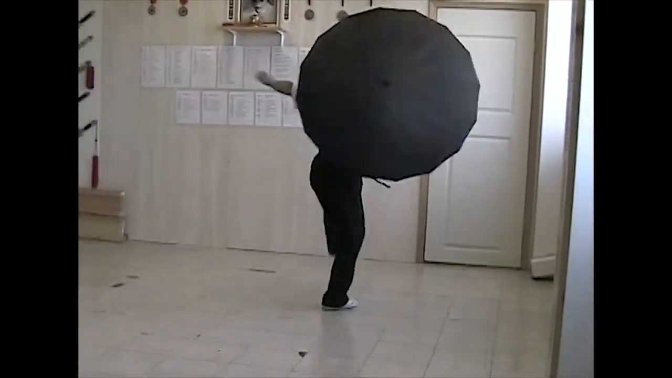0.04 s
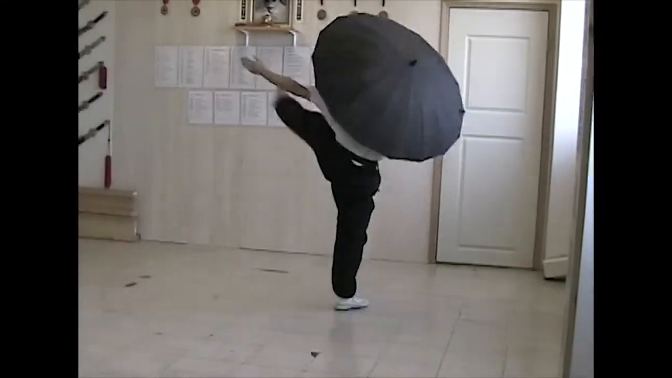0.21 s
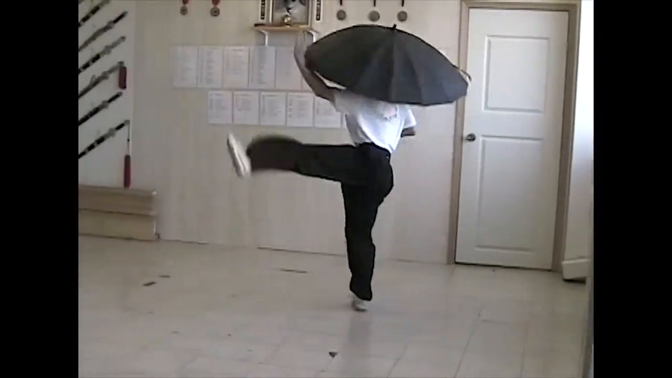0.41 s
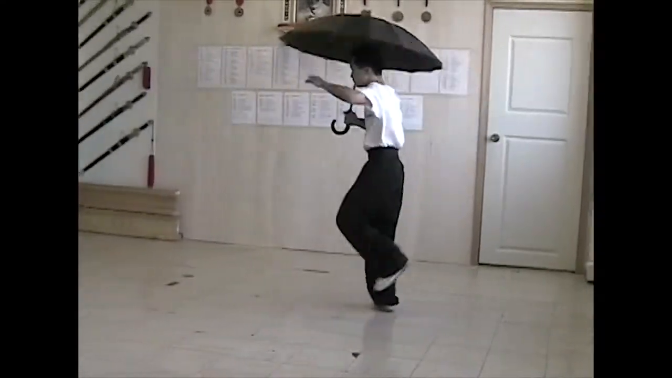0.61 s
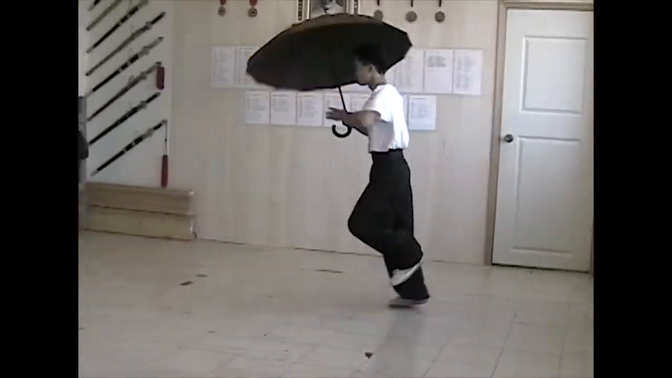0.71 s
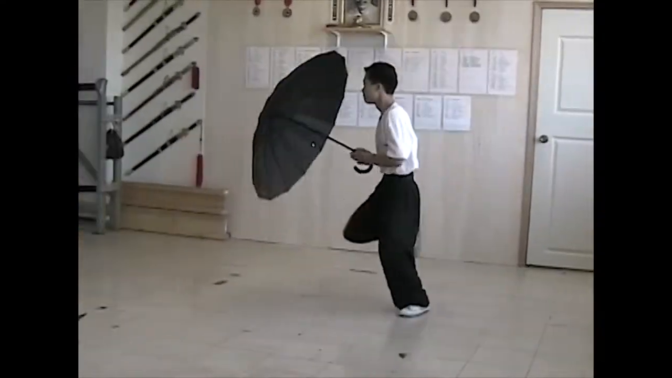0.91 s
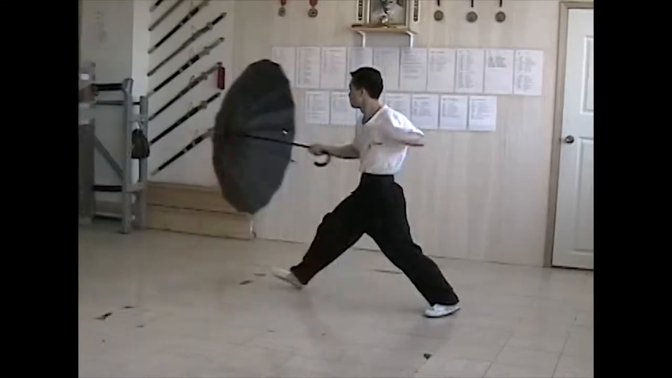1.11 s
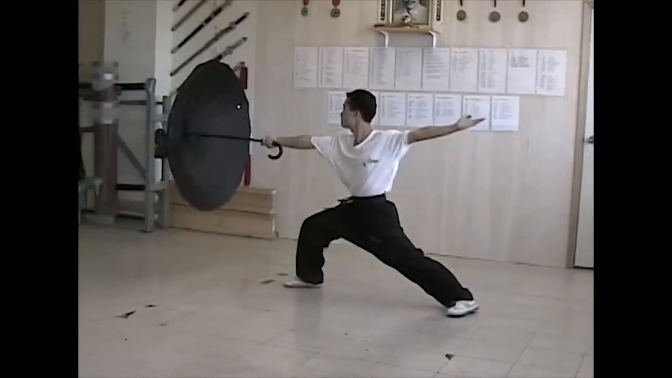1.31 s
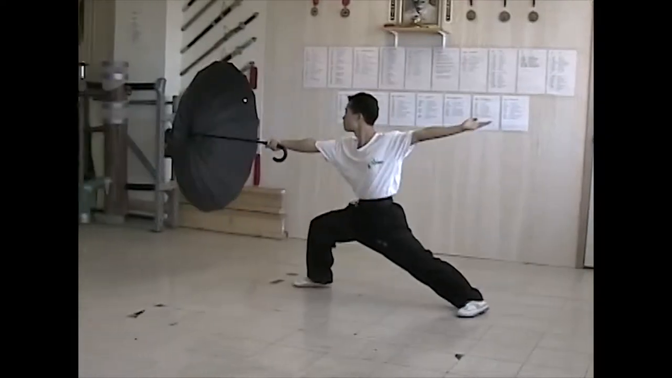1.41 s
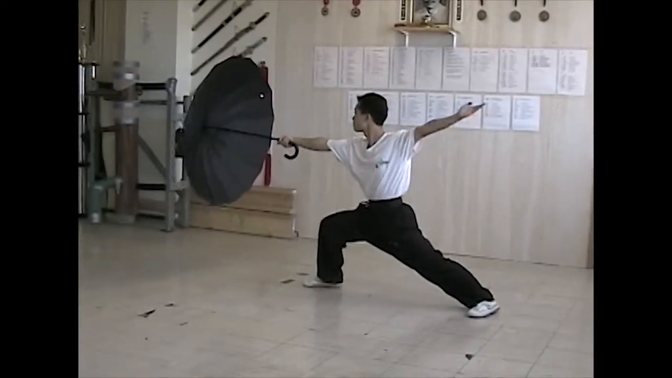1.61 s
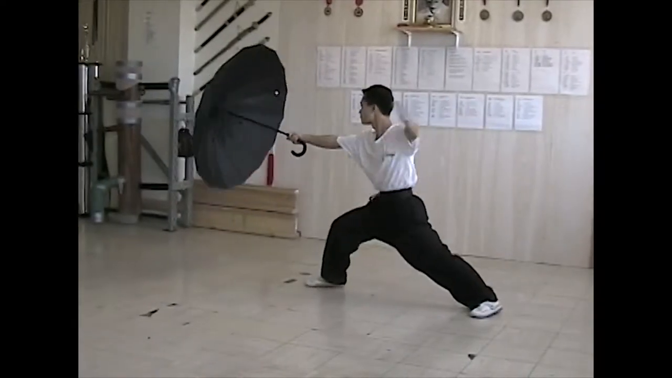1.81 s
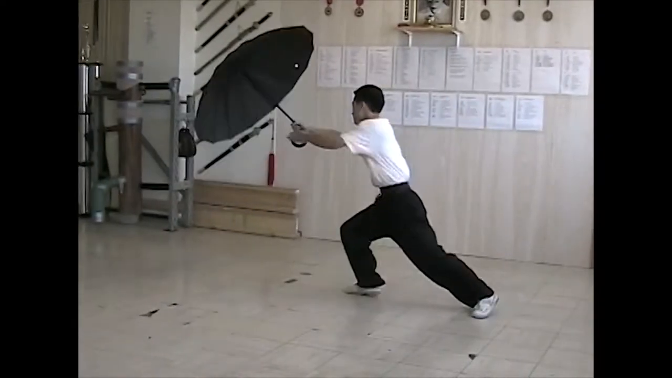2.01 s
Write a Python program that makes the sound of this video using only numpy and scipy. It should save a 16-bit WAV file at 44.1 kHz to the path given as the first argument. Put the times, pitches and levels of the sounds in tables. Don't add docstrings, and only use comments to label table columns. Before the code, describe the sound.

A sharp, hollow palm slap on a shoe cracks at 0.2 seconds and rings through a bare tiled hall. Cloth swishes near 0.45, then a hard flat stamp with a quick gritty clatter lands at 0.77. Fabric rustles around 0.9; a small tick at 1.1 leads into sliding shoe scuffs until 1.25. Quiet street and motor hum remains, with a soft swish near 1.9 and a very faint tick at 2.0.

```python
import sys
import numpy as np
from scipy import signal
from scipy.fft import rfft, irfft, next_fast_len
from scipy.io import wavfile
from scipy.ndimage import uniform_filter1d

SR = 44100
rng = np.random.default_rng(int(sys.argv[2]) if len(sys.argv) > 2 else 0)


def int16_out(signal):
    q = np.round(np.clip(np.atleast_2d(signal).T, -1, 1) * 32767)
    wavfile.write(sys.argv[1], SR, q.astype(np.int16))


def undo_db(level):
    steps = np.asarray(level, float) / 20
    return 10 ** steps


N = 90405


def read(table, hz):
    f, v = np.array(table, float).T
    return np.interp(np.log(np.maximum(hz, 1)), np.log(f), v)


def colour(x, *tables):
    size = 4096
    f = np.arange(size // 2 + 1) * SR / size
    gain_db = sum(read(table, f) for table in tables)
    cepstrum = irfft(np.log(undo_db(gain_db)))
    cepstrum[1:size // 2] *= 2
    cepstrum[size // 2 + 1:] = 0
    h = irfft(np.exp(rfft(cepstrum)))[:size // 2]
    return signal.fftconvolve(x, h / np.sqrt(np.sum(h ** 2)))[:N]


# (frequency [Hz], gain [dB])
MIC = [(4000, -2), (5800, 1), (6600, -2), (7600, -10), (9600, -7), (11500, -17.5), (16000, -30)]


def miked(x, *tables):
    return colour(x, *tables, MIC)


def bands(shape):
    size = next_fast_len(N, True)
    f = np.arange(size // 2 + 1) * SR / size
    octave = np.log2(np.maximum(f, 1))
    spectrum = rfft(rng.standard_normal(size))
    out = 0
    for hz in 22 * 2 ** np.arange(0, 10, .5):
        weight = np.cos(np.pi * np.clip(octave - np.log2(hz), -.5, .5)) ** 2
        out = out + irfft(spectrum * weight, size)[:N] * shape(hz)
    return out


def walk(rate):
    k = int(SR / rate)
    steps = np.repeat(rng.standard_normal(N // k + 1), k)
    return 0.85 * uniform_filter1d(uniform_filter1d(steps, k), k)[:N]


CRACKS_PER_S, CRACK_SPREAD_DB = 6000, 1


def cracks():
    chance, sign, size = rng.random((3, N))
    size = undo_db(np.minimum(-CRACK_SPREAD_DB * np.log(size + 1e-9), 12))
    x = (chance < CRACKS_PER_S / SR) * np.sign(sign - .5) * size
    return x / x.std()


def tone(hz, width_hz, db):
    x = signal.lfilter(*signal.iirpeak(hz, hz / width_hz, fs=SR), rng.standard_normal(N))
    return undo_db(db) * x / x.std()


# (frequency [Hz], level [dB])
HALL = [(20, -18), (60, -6), (150, -2), (400, 1.5), (1300, -4), (2300, -14), (5500, -21.5), (10000, -38)]
HALL_SIDE = [(20, -45), (150, -23), (500, -9), (1500, -21), (4000, -31), (8500, -34), (11000, -43),
             (16000, -47)]
HALL_DB, HALL_SIDE_DB, FLICKER_DB = -47, -63, 1.5


def hall():
    swell = walk(3.5)
    mid, side = (bands(lambda hz: undo_db(0.87 * swell + FLICKER_DB * walk(12.12))) for _ in range(2))
    hum = tone(350.6, width_hz=4.7, db=-60.5)
    whine = tone(5790, width_hz=27, db=-67)
    line = undo_db(-87) * np.sin(2 * np.pi * 15734 * np.arange(N) / SR)
    mid = undo_db(HALL_DB) * miked(mid, HALL) + whine + hum + line
    return np.array([mid, undo_db(HALL_SIDE_DB) * colour(side, HALL_SIDE)])


# (time [s], swish level [dB])
SWISH = [(0, -67), (.18, -69), (.36, -64), (.46, -54.5), (.52, -65.5), (.66, -63), (.74, -67), (.9, -57.5),
         (1.16, -70), (1.198, -57), (1.3, -60), (1.42, -77), (1.55, -75.5), (1.82, -74), (1.89, -61.5),
         (1.95, -62), (1.99, -66.5), (2.05, -67)]
# (frequency [Hz], gain [dB])
CLOTH = [(300, -30), (1500, -12), (4500, -4), (9500, 3), (13000, 4), (16000, 2)]


def swish():
    s, db = np.array(SWISH).T
    gain = undo_db(np.interp(np.arange(N) / SR, s, db) + 0.5 * walk(25.24))
    rustle = lambda: miked(rng.standard_normal(N) + .5 * cracks(), CLOTH)
    return np.array([gain * rustle() for _ in range(2)])


# (frequency [Hz], 60 dB decay time [s])
ROOM_T60 = [(100, 0.97), (300, 0.86), (800, 0.69), (2500, 0.63), (5000, .6), (9000, 0.49), (14000, .2)]
BUILD_S = 0.0045


def tail():
    t = np.arange(N) / SR
    return bands(lambda hz: undo_db(-60 * t / read(ROOM_T60, hz))) * (1 - np.exp(-t / BUILD_S))


def ring(modes):
    t = np.arange(SR // 8) / SR
    click = (t == 0)
    return click + sum(undo_db(db - 60 * t / t60) * np.sin(2 * np.pi * hz * t) for hz, db, t60 in modes)


def blows(rows, table, room_table, modes=(), sign=1):
    t, grit = np.arange(N) / SR, cracks()
    crackle, hit, far = np.zeros((3, N))
    for s, crack_db, crackle_db, length, room_db in rows:
        age = t - s
        crack = np.sinc(age * SR) * (abs(age) < .001)
        crackle = crackle + undo_db(crackle_db) * (age > 0) * np.exp(-np.clip(age, 0, 1) / length) * grit
        hit = hit + sign * undo_db(crack_db) * crack
        far = far + undo_db(room_db) * crack
    near = miked(crackle + signal.fftconvolve(hit, ring(modes))[:N], table)
    wet = lambda: miked(signal.fftconvolve(far, tail())[:N], room_table)
    return np.array([near + wet(), 0.44 * near + wet()])


# (time [s], crack level [dB], crackle level [dB rms], crackle length [s], room level [dB rms])
TICKS = [
    (1.1155, -16, -32.5, 0.0079, -41.5),
    (2.0028, -43, -44, 0.0075, -51),
    (2.013, -48, -54, 0.0061, -48),
]
# (frequency [Hz], gain [dB])
TICK = [(200, -24), (700, 4.5), (2000, -0.5), (4500, -0.5), (7000, -10.5), (16000, -32)]


def ticks():
    return blows(TICKS, TICK, TICK)


# (time [s], crack level [dB], crackle level [dB rms], crackle length [s], room level [dB rms])
SHOES = [
    (.723, -45, -52, 0.012, -46),
    (.974, -41, -46, 0.0066, -61),
    (1.1857, -40, -33, 0.017, -35),
    (1.2355, -35, -29.5, 0.013, -39),
    (1.2465, -36, -43, 0.003, -42.5),
    (1.399, -43, -51, .003, -81),
]
# (frequency [Hz], gain [dB])
SHOE = [(50, -29), (250, -4), (700, -2), (1800, 3.5), (2800, -6), (4200, 1), (9000, -5.5), (16000, -5)]
SHOE_ROOM = [(50, -19), (110, 2.5), (250, -7.5), (700, 0), (2000, -6.5), (4500, -9.5), (9000, -18),
             (16000, -18)]


def shoes():
    return blows(SHOES, SHOE, SHOE_ROOM)


# (time [s], crack level [dB], crackle level [dB rms], crackle length [s], room level [dB rms])
STAMPS = [
    (.7659, -2, -18, 0.022, -18),
    (.7725, -5, -35, .002, -52),
    (.7778, -6.5, -37, 0.0023, -33),
    (.7912, -9, -41, 0.0013, -56),
    (.8075, -10.5, -26.5, 0.0094, -40),
]
# (frequency [Hz], gain [dB])
STAMP = [(40, -43), (150, -15), (600, -3), (1100, -6), (2300, -9.5), (4000, -7.5), (9500, -4.5),
         (16000, -17)]
STAMP_ROOM = [(40, -41), (120, -12.5), (600, -1.5), (1100, -5.5), (2500, -13.5), (5000, -6.5),
              (9000, -20.5), (16000, -24)]
# (frequency [Hz], level [dB], 60 dB decay time [s])
SOLE = [(510, -29.5, 0.11), (653, -21.5, .08), (1148, -20, 0.051), (3640, -9.5, .01), (5060, -17.5, 0.014)]


def stamps():
    return blows(STAMPS, STAMP, STAMP_ROOM, SOLE)


# (time [s], crack level [dB], crackle level [dB rms], crackle length [s], room level [dB rms])
SLAPS = [
    (.2160, -12, -34, 0.00067, -45),
    (.2173, 1, -12, .004, -14),
    (.2246, -8, -9.5, 0.0026, -57),
    (.2266, -4.5, -26, 0.0023, -52),
    (.2279, -17, -4.5, 0.0013, -38),
]
# (frequency [Hz], gain [dB])
SLAP = [(60, -34), (350, -23.5), (550, -3.5), (1000, 0), (2100, -2), (2900, -2.5), (6000, -18),
        (16000, -19.5)]
SLAP_ROOM = [(60, -55), (200, -18), (400, -3), (1000, -4.5), (2000, -11), (4800, -12), (7000, -27.5),
             (16000, -36)]
# (frequency [Hz], level [dB], 60 dB decay time [s])
PALM = [(515, -20.5, 0.048), (716, -14, 0.028), (977, -21.5, 0.024), (1098, -14.5, 0.018),
        (1288, -20, 0.035), (2010, -6, 0.0062)]


def slaps():
    return blows(SLAPS, SLAP, SLAP_ROOM, PALM, sign=-1)


# (frequency [Hz], side minus mid [dB])
WIDTH = [(60, -15), (150, -20), (380, -16), (700, -17), (2400, -18.5), (4400, -18), (8100, -3.5),
         (15000, 6)]
PORT_HZ, PORT_DB = 121, 1.5


def port_side(mid, side):
    f = np.arange(N // 2 + 1) * SR / N
    wide = rfft(side) * undo_db(read(WIDTH, f))
    bass = rfft(mid) * undo_db(PORT_DB) / (1 + (f / PORT_HZ) ** 2)
    return irfft(1j * (wide + bass), N)


BALANCE_DB = -0.02


def scene():
    floor = hall()
    mid, side = swish() + ticks() + shoes() + stamps() + slaps()
    mid = mid + floor[0]
    side = floor[1] + port_side(mid, side)
    return np.array([mid + side, mid - side]) * undo_db(np.array([[BALANCE_DB], [-BALANCE_DB]]) / 2)


def top_cut(x):
    return signal.sosfilt(signal.butter(12, 16360, fs=SR, output="sos"), x)


DRUM_LAG = 147
NOTCH_KEEP, CEILING = 0.64, .95


def record(dry):
    b, a = np.zeros((2, DRUM_LAG + 1))
    b[0], b[-1] = 1, -1
    a[0], a[-1] = 1, -NOTCH_KEEP
    x = signal.lfilter(b * (1 + NOTCH_KEEP) / 2, a, dry)
    mix = np.tanh(x / CEILING) * CEILING
    return top_cut(mix)


dry = scene()
out = record(dry)
int16_out(out)
```